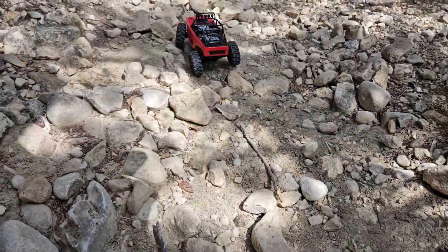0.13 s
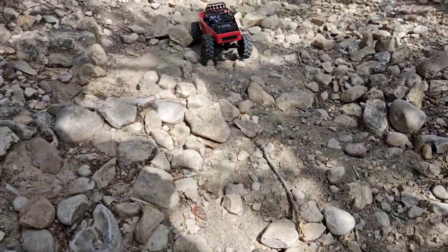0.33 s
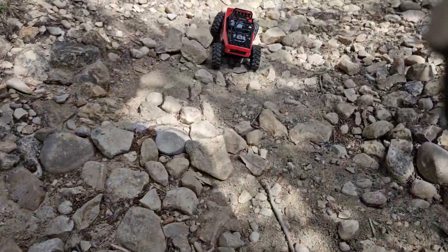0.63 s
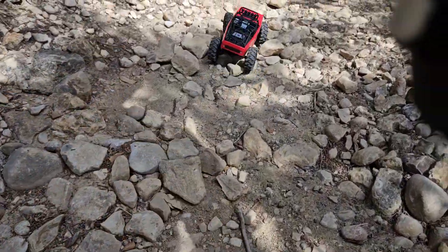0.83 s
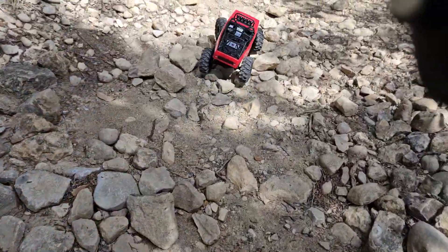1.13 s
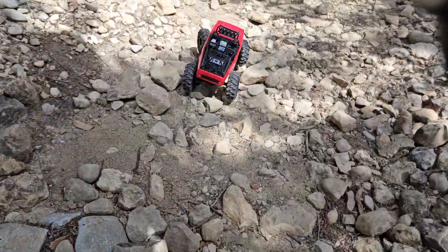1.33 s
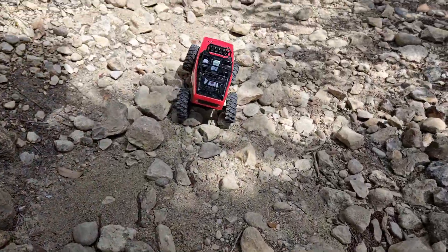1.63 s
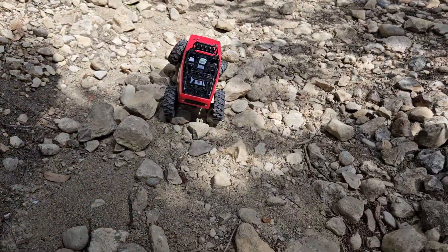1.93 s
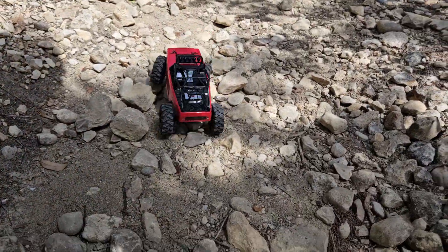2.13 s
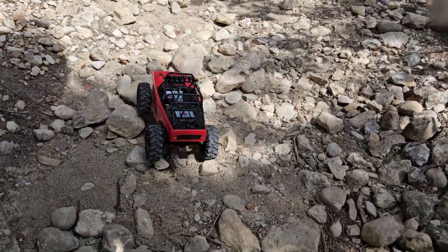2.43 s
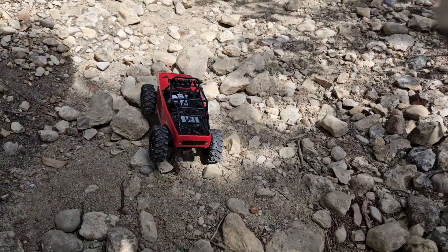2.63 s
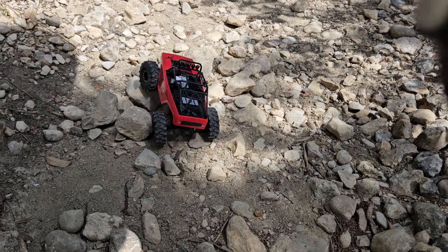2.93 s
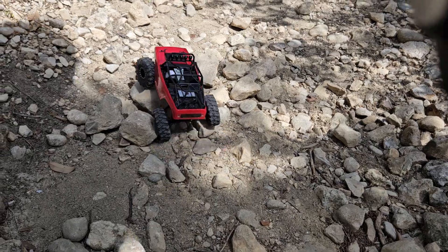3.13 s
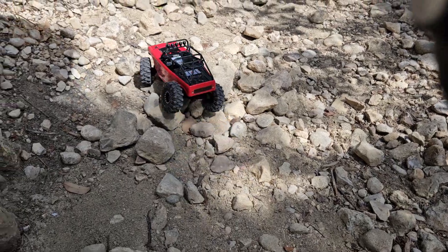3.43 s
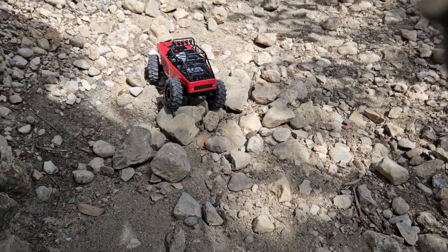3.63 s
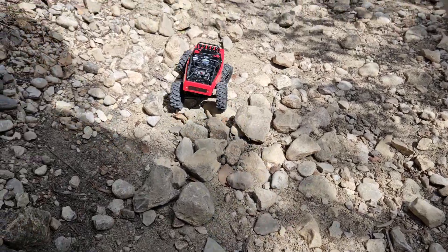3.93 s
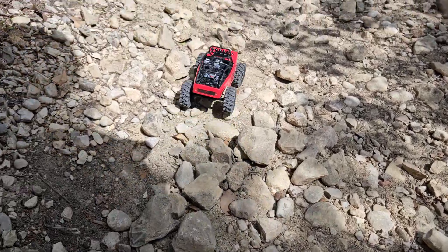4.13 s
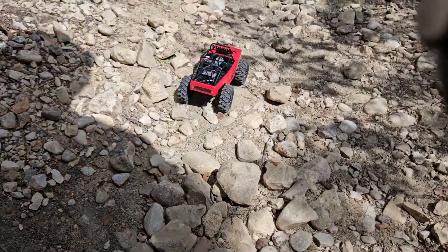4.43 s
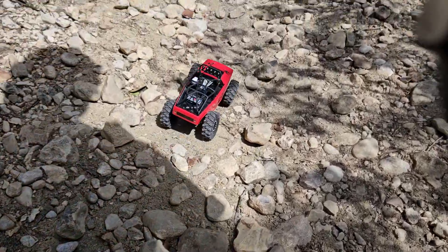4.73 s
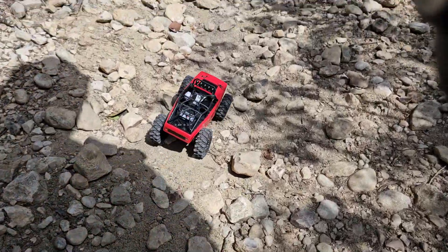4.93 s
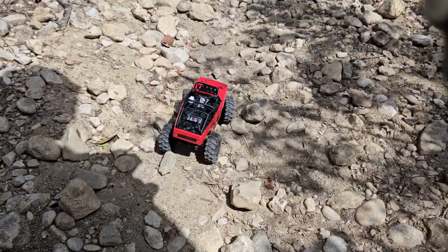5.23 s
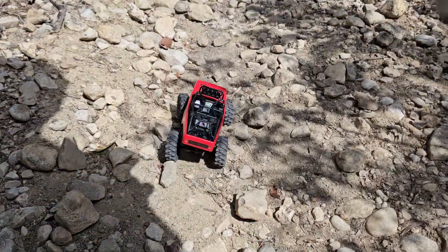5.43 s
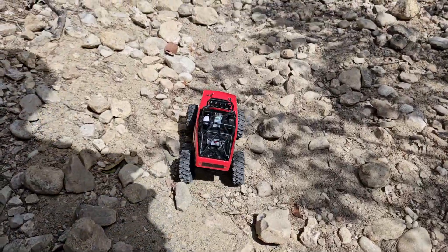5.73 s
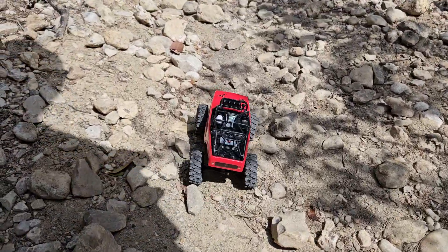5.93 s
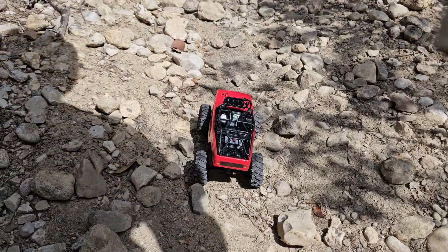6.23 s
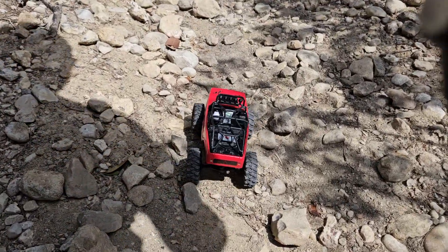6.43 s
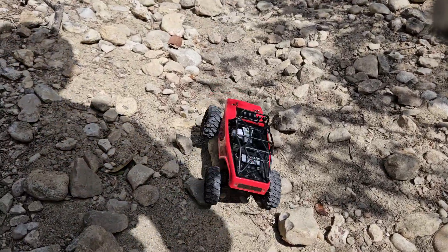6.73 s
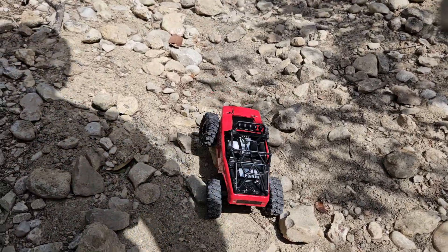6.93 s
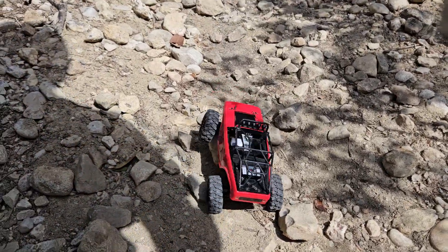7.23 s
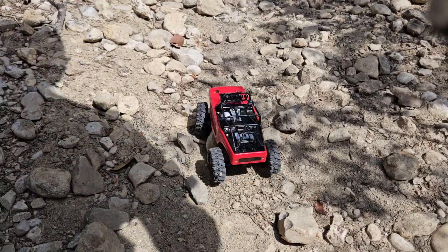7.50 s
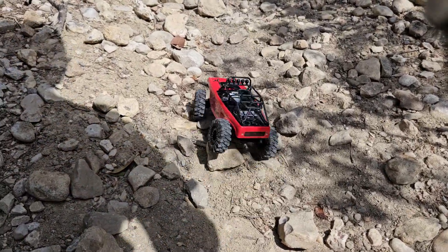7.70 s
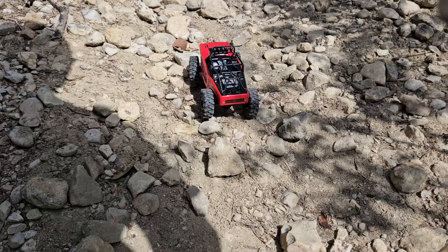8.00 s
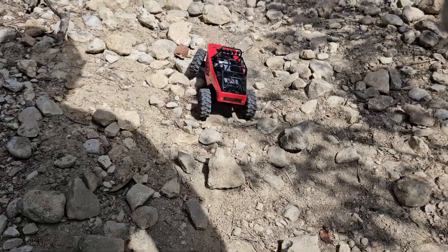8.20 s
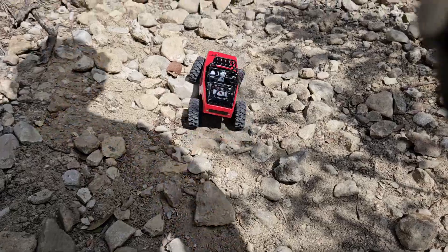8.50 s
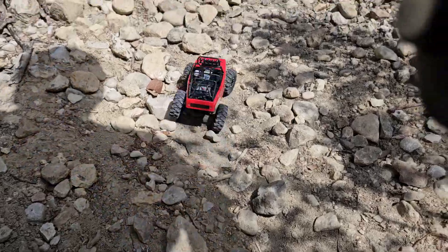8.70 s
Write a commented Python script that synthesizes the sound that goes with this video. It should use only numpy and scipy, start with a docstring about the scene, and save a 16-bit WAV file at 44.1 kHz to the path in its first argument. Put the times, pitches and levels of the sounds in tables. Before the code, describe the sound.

A toy crawler works over loose rocks: shrill, fluttering motor gears, dry plastic chatter and patchy gravel crunch, starting and stopping together. Short stone clicks come in clusters, then a strong rock knock with low thuds midway. Later the pulls grow louder and grittier, a near-silent gap falls around seven seconds, and driving resumes before another short pause. Close, dry outdoor stereo sound with very quiet distant rumble and no reverberation.

```python
"""A toy off-road car crawls over loose stones, followed on foot. Its gears whine as near sines that follow the
motor speed. Random jolts rattle the ringing plastic chassis and crunch gravel, made of patchy noise.
Stones clack and shift with a thud as short groups of fading sines; one such group sharpens the start of a whine.
A far rumble of shaped noise lies below. Two microphone ports colour and delay the sound differently."""
import sys
import numpy as np
from scipy import signal
from scipy.fft import rfft, irfft, next_fast_len
from scipy.io import wavfile

SR = 44100
rng = np.random.default_rng(int(sys.argv[2]) if len(sys.argv) > 2 else 0)


def generate_wav(signal):
    """Clip the signal to [-1, 1] and save it as 16-bit WAV at the path in sys.argv[1]."""
    frames = np.transpose(np.atleast_2d(signal))
    scaled = np.clip(frames, -1, 1) * 32767
    pcm = np.round(scaled).astype(np.int16)
    wavfile.write(sys.argv[1], SR, pcm)


N = 390726
PADDED = next_fast_len(N)
BIN_HZ = np.maximum(np.fft.rfftfreq(PADDED, 1 / SR), 1)

# ringing tones of the plastic chassis: (frequency [Hz], level [dB], time to fade by 60 dB [s])
CHASSIS_MODES = [(637, -7.5, 0.047), (773, 1.5, 0.017), (936, 9, 0.015), (1087, 1.5, 0.029),
                 (1264, 5.5, 0.0086), (1646, 2.5, 0.011)]


def gears(wobble=.065, throb_db=5.0, flicker_db=2.5, loose_hz=3050, rasp=.55, jump=.025, broken_db=3.0):
    """Teeth mesh as a near sine; at speed the slack in the drive shakes pitch and level and knocks the chassis."""
    # pulls of a motor: (level [dB], overtone level [dB], rows of (time [s], tooth rate [Hz]))
    pulls = [ (-55, -4, [(0.0, 3120), (.17, 3400), (.21, 3850), (.26, 3790), (.35, 3040)]),
             (-50, -5, [(.37, 3050), (.48, 2674), (.53, 3050), (.61, 3080), (.65, 2350), (.69, 3120),
             (.87, 3050), (.96, 2390)]), (-48.5, -3, [(.91, 4670), (1.0, 4840), (1.11, 4265), (1.13, 5120),
             (1.19, 5250), (1.21, 4185), (1.34, 4546), (1.57, 4310)]), (-50, -5, [(1.97, 2500),
             (2.03, 3030), (2.1, 2940)]), (-52, -1, [(2.655, 2200), (2.69, 2750), (2.745, 2500),
             (2.765, 3000), (2.785, 2680), (2.83, 2850), (2.87, 2430), (2.9, 2400)]),
             (-50, 2, [(2.915, 2000), (2.95, 1770), (2.99, 2140), (3.02, 2060), (3.04, 1763), (3.075, 1614),
             (3.105, 1805), (3.13, 1640), (3.185, 1596)]), (-49, -7, [(3.2, 2362), (3.24, 3060),
             (3.29, 3285), (3.33, 2934), (3.35, 2150), (3.47, 2030), (3.57, 2226)]),
             (-46.5, -13, [(3.59, 2466), (3.62, 2976), (3.655, 2636), (3.72, 2994), (3.76, 3380),
             (3.84, 3344), (3.87, 3054), (3.99, 2760), (4.06, 2850), (4.12, 2520), (4.28, 3256)]),
             (-50, -8, [(4.3, 3000), (4.335, 2540), (4.42, 3460)]), (-43, -12, [(4.47, 3300), (4.51, 2770),
             (4.57, 2920)]), (-52, 0, [(4.57, 1890), (4.615, 1740), (4.67, 2200), (4.71, 2085),
             (4.74, 1720), (4.83, 1346), (4.88, 1370), (4.915, 1600), (4.95, 1590), (4.99, 2050)]),
             (-48.5, -1, [(5.095, 1520), (5.115, 1400), (5.155, 1506)]), (-48, -5, [(5.19, 2750),
             (5.27, 3220), (5.51, 3600), (5.71, 3054), (5.83, 3500), (5.95, 3500), (6.07, 2790),
             (6.11, 1810), (6.15, 1195)]), (-45, -3, [(6.42, 3214), (6.52, 3300), (6.55, 4100),
             (6.62, 4740), (6.69, 4450), (6.705, 3800), (6.722, 3300)]), (-47, 4, [(6.722, 3000),
             (6.737, 2350), (6.775, 2055), (6.82, 1100)]), (-44, 0, [(7.21, 2550), (7.24, 3300),
             (7.272, 2816), (7.3, 3900), (7.32, 4350), (7.56, 4314), (7.6, 3950)]),
             (-42.5, 1, [(7.603, 3300), (7.625, 3360), (7.645, 4094), (7.662, 3500), (7.68, 4114),
             (7.71, 4170), (7.722, 3550), (7.74, 3800), (7.76, 3620), (7.79, 3700)]),
             (-49, -2, [(7.795, 3360), (7.84, 4240), (7.87, 4330)]), (-51, 0, [(8.34, 1206), (8.39, 1293),
             (8.46, 2330)]), (-48, -8, [(8.465, 2560), (8.545, 3020), (8.575, 2750), (8.66, 3280),
             (8.74, 3210), (8.78, 2560), (8.84, 2690)]), ]
    # overtones of the tooth rate: (multiple [1], level [dB])
    overtones = [(1, 0), (2, -2), (3, -4)]
    # what the gearbox lets out: (frequency [Hz], gain [dB])
    housing = [(1200, -20), (2200, -11), (2650, -4), (3600, -3), (4600, 3), (5700, 0), (6600, -8),
               (8400, -2), (10000, -17), (12800, -10)]
    # the slack swings more slowly at speed: (tooth rate [Hz], swings [per s])
    shake = [(3450, 43), (4350, 32)]
    kick_db = -6   # strength of each knock on the chassis, relative to the whine

    whine, kicks = np.zeros(N), np.zeros(N)
    flicker, lurch, grind = drift(24.6), drift(10), drift(400)
    # the load never rests: pitch wavers, overtones come and go
    waver = .014 * drift(22) + .014 * drift(90)
    slack, broken = drift(9), drift(15.6)
    for level_db, bite_db, rows in pulls:
        s, hz = np.transpose(rows)
        span = slice(round(s[0] * SR), round(s[-1] * SR))
        t = np.arange(N)[span] / SR
        hz = np.interp(t, s, hz)

        # swings counted since the start of the pull, from a random point
        swing = np.cumsum(at_hz(shake, hz) / SR * (1 + .3 * lurch[span])) + rng.random()
        speed = np.clip((hz / loose_hz - 1) * 8 + .2, .15, 1)
        depth = speed * np.clip(1 + .4 * slack[span], .3, 1.5)
        sag = signal.sawtooth(2 * np.pi * swing, .25)   # quick catch, slow fall
        # no two swings catch at the same pitch
        catch = jump * rng.standard_normal(64)[swing.astype(int)]
        shaken_hz = hz * (1 + depth * (wobble * sag + catch) + waver[span])
        phase = 2 * np.pi * np.cumsum(shaken_hz) / SR

        weak_db = bite_db + broken_db * broken[span]
        tone = 0
        for k, db in overtones:
            partial_db = db + weak_db * (k >= 2) + at_hz(housing, k * hz)
            tone = tone + amp(partial_db) * np.sin(k * phase)
        tone = tone * (1 + rasp * grind[span])   # rough flanks spread noise beside each line

        fade = np.clip(np.minimum(t - s[0], s[-1] - t) / 0.0095, 0, 1)
        throb = -throb_db * depth * np.cos(2 * np.pi * swing)   # loudest during the fall
        gain = fade * amp(level_db + flicker_db * flicker[span])
        whine[span] += gain * tone * amp(throb)
        new_swing = np.diff(np.floor(swing), prepend=int(swing[0]))
        kicks[span] += gain * new_swing * depth * amp(kick_db)

    knocks = sum(amp(db) * ring(kicks, hz, t60) * (-1) ** k
                 for k, (hz, db, t60) in enumerate(CHASSIS_MODES))
    return whine + knocks


def rolling(jolt, grinding, rattle_db, crunch_db):
    """Each jolt of the tyres shakes the chassis and crushes gravel at once."""
    # colour of the crushed gravel: (frequency [Hz], level [dB per Hz])
    gravel = [(300, 8.5), (1500, 2), (2300, 6), (3500, 9), (5000, 10), (6300, 1), (8300, 0), (10000, -5),
              (12500, 2.5), (16000, -8)]
    brighten, press_from_db = 0.47, -57.5   # dB of extra top per dB of crunch above this level

    knocks = grains(700 * amp(1.9 * jolt), 3.1)
    dealt = rng.integers(0, len(CHASSIS_MODES), N)   # each knock rings just one mode
    rattle = sum(amp(db) * ring(knocks * (dealt == k), hz, t60)
                 for k, (hz, db, t60) in enumerate(CHASSIS_MODES))
    rattle = rms_one(rattle * amp(2.12 * jolt))

    grit = colour(rng.standard_normal(N) * amp(1.53 * jolt) * grinding, gravel)
    press_db = brighten * np.maximum(crunch_db - press_from_db, -8.5)
    crunch = patchy(grit, patchy_db=3.5, press_db=press_db)
    return amp(rattle_db - 3.5) * rattle + amp(crunch_db + 7.0) * crunch


def drive_levels():
    """The car rolls in bursts; at each moment the loudest burst sets the rattle and crunch levels."""
    # bursts: (fade as it stops [dB per s], rows of (time [s], rattle before a 3.5 dB cut [dB],
    # crunch before a 7 dB lift [dB]))
    drives = [ (203, [(0.0, -55.5, -61.5), (.55, -51, -57), (.9, -53.5, -57), (1.02, -52.5, -65.5),
              (1.09, -45, -56.5), (1.17, -50.5, -59.5), (1.46, -44, -58), (1.7, -48.5, -57)]),
              (280, [(1.98, -58, -62), (2.25, -48.5, -53.5), (2.44, -53.5, -57)]),
              (102.7, [(2.67, -66, -61), (2.79, -47.5, -57), (3.1, -59, -64.5), (3.33, -49.5, -54.5),
              (3.53, -41, -56.5), (4.03, -60, -64), (4.31, -49.5, -59), (4.49, -49, -58), (4.9, -54.5, -67),
              (5.15, -41.5, -55.5), (5.3, -50, -62), (5.95, -47.5, -58), (6.1, -50, -59.5)]),
              (111, [(6.44, -52, -54), (6.7, -47.5, -48), (6.8, -48, -56)]), (111, [(7.21, -51.5, -61),
              (7.34, -42.5, -49.5), (7.6, -45.5, -55.5), (7.94, -51, -53.5), (7.99, -53, -63),
              (8.18, -56, -60)]), (120, [(8.33, -57.5, -67), (8.47, -53, -61), (8.86, -49, -55)]), ]
    return np.max([burst(*drive) for drive in drives], axis=0)


def burst(coast_db_per_s, rows):
    """Levels of one burst: they swell in before its first row and die after its last."""
    start_db_per_s = 371
    t, (s, *levels) = np.arange(N) / SR, np.transpose(rows)
    before_db = start_db_per_s * np.maximum(s[0] - t, 0)
    after_db = coast_db_per_s * np.maximum(t - s[-1], 0)
    return [np.interp(t, s, db) - (before_db + after_db) for db in levels]


def scuffs(per_s=80, spread_db=4.0, length_s=.005, bed=1.9):
    """Envelope of pebbles grinding past each other: short swells over a steady bed."""
    swell = np.hanning(round(length_s * SR))
    return bed + rms_one(np.convolve(abs(grains(per_s, spread_db)), swell, "same"))


def patchy(x, patchy_db, press_db, rate=18):
    """Pebbles differ in size: each band swells and fades on its own; the top band needs a hard press."""
    edges = np.array([0, 1600, 2600, 3800, 5600, 7500, 10500, SR])[:, None]   # band limits in Hz
    bands = shaped(x, (BIN_HZ >= edges[:-1]) * (BIN_HZ < edges[1:]))
    bands = bands * amp([patchy_db * drift(rate) for _ in edges[1:]])
    return rms_one(bands[:-1].sum(axis=0) + bands[-1] * amp(press_db))


def clacks():
    """Stone on stone, and at 0.951 s the sharp start of a gear whine; each has a softer echo 1 or 2 ms later."""
    # clacks and the whine's start: (time [s], relative strength [dB], centre frequency [Hz],
    # relative treble [dB])
    touches = [(0.145, -40.5, 5200, 4.5), (0.479, -19, 2960, -43), (0.546, -14.5, 1060, -16),
               (0.618, -15.5, 850, -37), (0.774, -20.5, 3160, -22), (0.863, -18, 4870, -19),
               (0.951, -23, 4840, -37), (1.063, -24, 4920, -37), (1.316, -13.5, 695, -22),
               (1.601, -20.5, 1510, -31), (2.26, -18, 960, -7), (2.343, -21, 1060, -25),
               (2.41, -28, 5500, -12), (3.34, -20.5, 1040, -13), (3.412, -16.5, 860, -36),
               (3.449, -23, 3800, -35), (3.479, -19, 905, -26), (3.517, -21, 939, -31),
               (3.55, -24, 1133, -31), (4.292, -20, 706, -22), (4.925, -27.5, 865, -30),
               (4.993, -15.5, 700, -41), (5.0014, 2, 3900, -66), (5.0101, -9, 2000, -39),
               (5.0124, -1, 4950, -53), (5.034, -11, 700, -52), (5.044, -16, 900, -38.5),
               (5.124, -17.5, 832, -33), (5.25, -24, 1310, -34), (5.31, -26, 4770, -39),
               (5.693, -19, 1520, -18), (5.949, -14.5, 573, -18), (5.967, -8, 500, -29),
               (5.971, -14, 620, -11.5), (6.035, -19, 560, -40), (6.069, -11, 4300, -23),
               (6.33, -33.5, 4450, -28), (6.349, -29, 4500, -27), (6.447, -31, 3280, -7),
               (6.729, -15, 970, -18), (6.784, -23.5, 3710, -12), (6.878, -25.5, 4630, -21.5),
               (6.905, -27.5, 4340, -27.5), (7.922, -16.5, 4830, -30), (7.949, -15, 5400, -23.5),
               (8.047, -26, 4750, -22), (8.078, -28.5, 4170, -16), (8.774, -19, 956, -15)]
    # ringing tones of a stone: (frequency [Hz], level [dB], time to fade by 60 dB [s])
    stone = [(543, -4, 0.011), (814, -2, 0.012), (1060, 0.5, 0.0053), (1420, -5.5, 0.014),
             (2180, -5.5, 0.016), (2750, 9.5, 0.001), (3500, 4, 0.0029), (4950, 3, 0.0061),
             (5820, 22, 0.011), (7940, 8, 0.014), (11750, 31.5, 0.00093)]
    contact_hz = 6160   # the body of a stone takes no sharper push than this

    first = np.array(touches)
    delay_s = rng.uniform(.0007, 0.0018, len(first))
    # the second touch is 3.5 dB softer, with 2 dB more relative treble
    again = first + np.outer(delay_s, [1, 0, 0, 0]) - [0, 3.5, 0.0, -2.0]
    rows = np.vstack([first, again])
    low_modes = [mode for mode in stone if mode[0] <= 5.6e3]
    high_modes = [mode for mode in stone if mode[0] > 5.6e3]
    how = (rows[:, 1] - 9, 5.15, rows[:, 2], rows[:, 3])
    body, edge = blows(rows, low_modes, *how), blows(rows, high_modes, *how)
    return signal.sosfilt(signal.butter(2, contact_hz, fs=SR, output="sos"), body) + edge


def thuds():
    """Stones shift underfoot: soft blows set low tones ringing."""
    # shifts: (time [s], relative strength [dB])
    shifts = [(1.299, -27), (4.998, -16.5), (5.036, -18.5), (5.127, -24), (5.968, -17)]
    # ringing tones of the ground: (frequency [Hz], level [dB], time to fade by 60 dB [s])
    ground = [(130.3, -7.5, 0.11), (209, -5, 0.076), (295, -6, 0.058), (457, -6, 0.034)]
    rows = np.array(shifts)
    # the low-pass filter makes the contact soft
    return signal.lfilter([.1], [1, -.9], blows(rows, ground, rows[:, 1] - 5))


def blows(rows, modes, gain_db, fall_db=0.0, centre_hz=1000, treble_db=0.0):
    """Each blow strikes every mode a little off pitch, less so off centre; its treble level sets those above 5.6 kHz."""
    uneven_db, detune = 2.5, .07   # no two blows alike: spread of strength, and of pitch as a fraction
    at, out = np.round(rows[:, 0] * SR).astype(int), np.zeros(N + SR)
    luck = rng.standard_normal((len(at), 2 * len(modes)))
    for k, (hz, level_db, t60) in enumerate(modes):
        size_db = gain_db + level_db + uneven_db * luck[:, 2 * k]
        size_db = size_db - fall_db * abs(np.log2(hz / centre_hz)) + treble_db * (hz > 5.6e3)
        n = np.arange(int(t60 * SR) + 2)
        turns = np.outer(hz * (1 + detune * luck[:, 2 * k + 1]), n / SR)
        tone = amp(-60 * n / SR / t60) * np.sin(2 * np.pi * turns)
        np.add.at(out, at[:, None] + n, (-1) ** k * amp(size_db)[:, None] * tone)
    return out[:N]


def far_rumble():
    """Steady random noise with most of its strength in the deep bass."""
    # colour of the rumble: (frequency [Hz], relative level [dB per Hz])
    far = [(12, -29), (42, 3), (97, 1), (184, -13.5), (261, -20.5), (458, -27), (1840, -32), (2540, -44),
           (5000, -46.5), (6500, -54.5), (9800, -75.5), (13000, -59), (15600, -73.5)]
    return amp(-46.5) * colour(rng.standard_normal(N), far)


def scattered(x):
    """Sound that reaches the ports from other sides: opposed, mostly treble."""
    # share that is unalike at the ports: (frequency [Hz], level [dB])
    unlike = [(60, -22.5), (250, -13.5), (1000, -9.5), (4000, -2), (9000, -2)]
    return shaped(x, amp(at_hz(unlike, BIN_HZ))) * [[1], [-1]]


def amp(db):
    """Turn decibels into a gain."""
    return 10 ** (np.asarray(db) / 20)


def rms_one(x):
    """Scale to an average (rms) strength of 1."""
    return x / np.sqrt(np.mean(x ** 2) + 1e-20)


def at_hz(points, hz):
    """Read a table on a log-frequency axis."""
    table_hz, values = np.array(points).T
    return np.interp(np.log(hz), np.log(table_hz), values)


def drift(rate):
    """Smooth random wandering of spread 1; a higher rate wanders faster."""
    r = np.exp(-40 * np.pi * rate / SR)   # one step per 20 samples
    slow = signal.lfilter([1], [1, -2 * r, r * r], rng.standard_normal(N // 20 + 2002))[2000:]
    return np.interp(np.arange(N) / 20, np.arange(len(slow)), rms_one(slow))


def ring(clicks, hz, t60):
    """A unit click sets off a sine that starts near height 1 and fades by 60 dB in t60 seconds."""
    r, w = amp(-60 / (t60 * SR)), 2 * np.pi * hz / SR
    return signal.lfilter([0, np.sin(w)], [1, -2 * r * np.cos(w), r * r], clicks + 1e-18)


def grains(per_s, spread_db):
    """Random clicks of very uneven size."""
    sizes = amp(spread_db * np.minimum(rng.exponential(1, N), 3.5)) * rng.choice([-1, 1], N)
    return sizes * (rng.random(N) < per_s / SR)


def shaped(x, gain):
    """Filter by a gain for each frequency."""
    return irfft(rfft(x, PADDED) * gain, PADDED)[..., :N]


def colour(x, spectrum):
    """Shape noise by a spectrum; rms 1."""
    return rms_one(shaped(x, amp(at_hz(spectrum, BIN_HZ))))


def scene():
    """Car, stones and far rumble; the spread-out noises are drawn twice, ahead and around."""
    jolt, grinding = drift(12) + .8 * drift(40), scuffs()   # bumps under the wheels, grinding pebbles
    levels = drive_levels()
    ahead, around = (rolling(jolt, grinding, *levels) + far_rumble() for _ in range(2))
    return gears() + thuds() + clacks() + ahead + scattered(around)


def record(dry):
    """Each port has its own colour, the right one trails; the top is cut."""
    # level of left over right: (frequency [Hz], difference [dB])
    balance = [(3000, .3), (5200, -6), (6300, 2), (7300, 11), (10800, 12), (12000, -2)]
    # how far the right port trails: (frequency [Hz], phase [radians])
    lag = [(150, 0), (500, 0.56), (1460, 1), (3000, 1.02), (4700, 1.44), (6000, 3), (8200, 5.5),
           (9800, 9.5), (12500, 14.5)]
    half_db = at_hz(balance, BIN_HZ) / 2
    ports = [amp(half_db), amp(-half_db) * np.exp(-1j * at_hz(lag, BIN_HZ))]
    top_cut = signal.cheby2(16, 80, 16700, fs=SR, output="sos")   # 80 dB down from 16700 Hz
    return signal.sosfilt(top_cut, shaped(dry, ports))


dry = scene()
out = record(dry)
generate_wav(out)
```